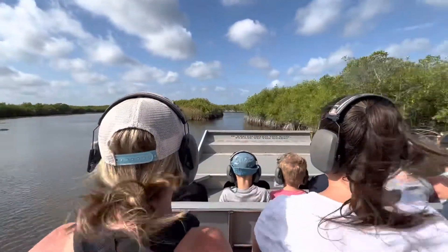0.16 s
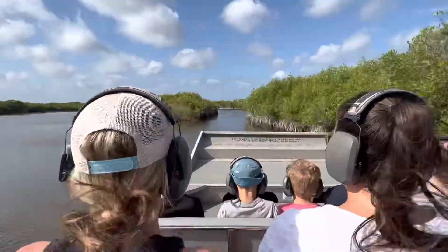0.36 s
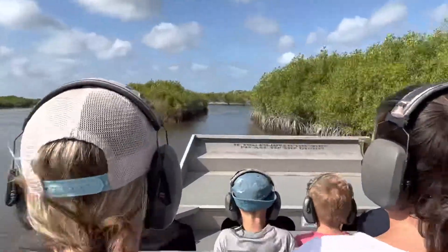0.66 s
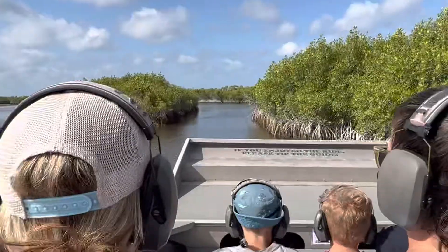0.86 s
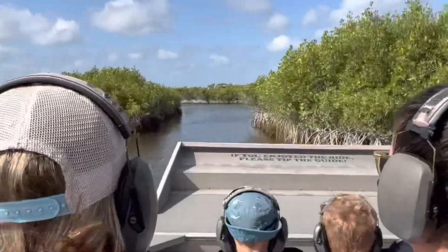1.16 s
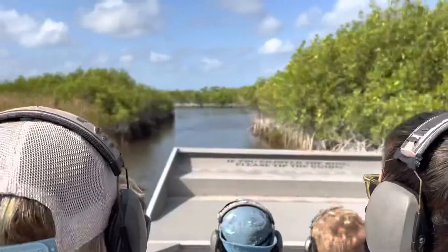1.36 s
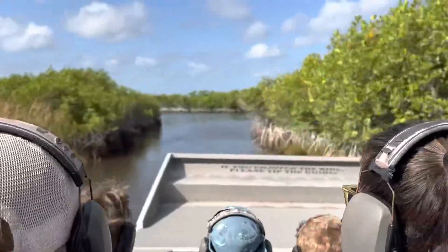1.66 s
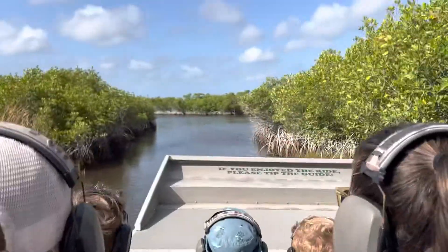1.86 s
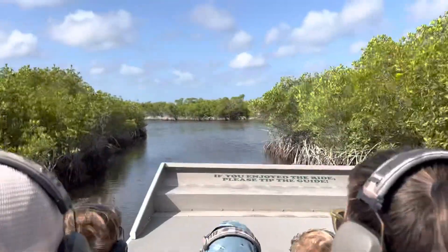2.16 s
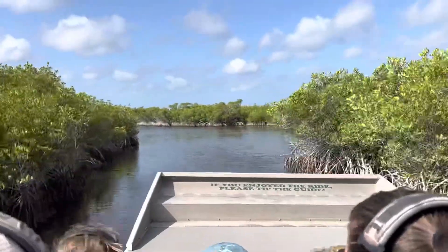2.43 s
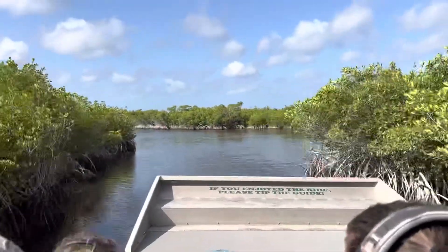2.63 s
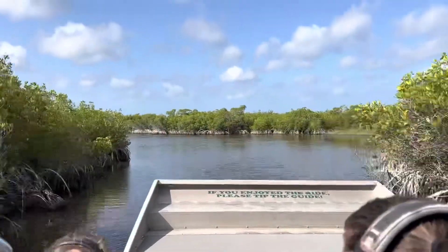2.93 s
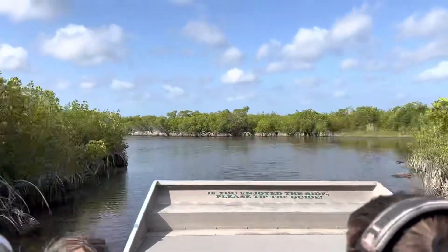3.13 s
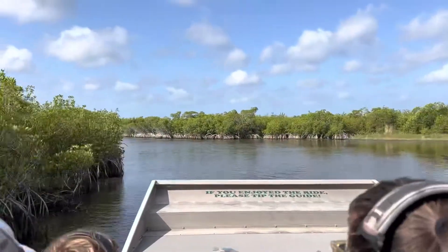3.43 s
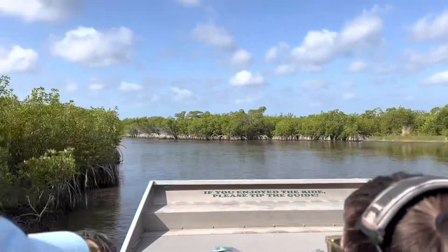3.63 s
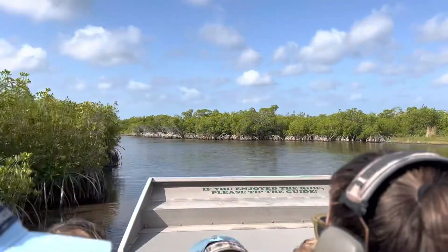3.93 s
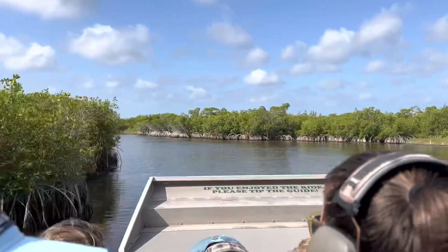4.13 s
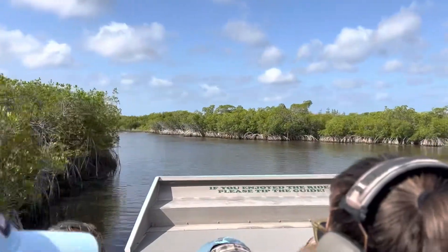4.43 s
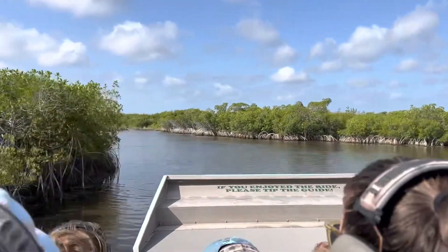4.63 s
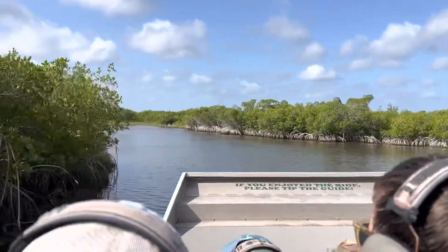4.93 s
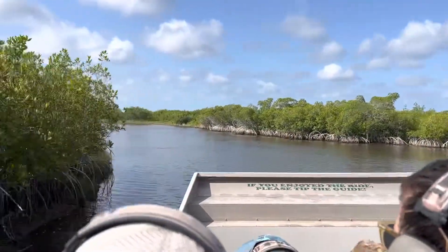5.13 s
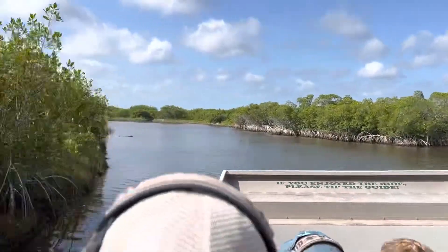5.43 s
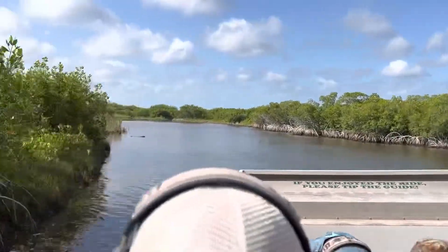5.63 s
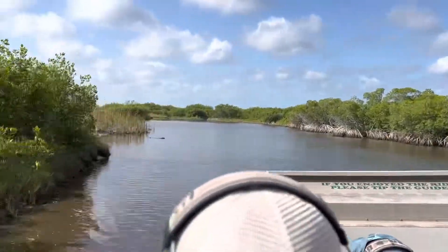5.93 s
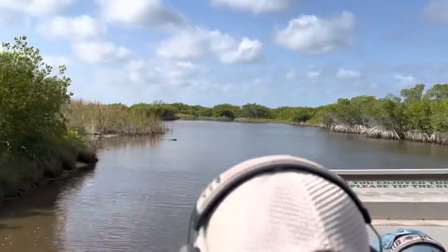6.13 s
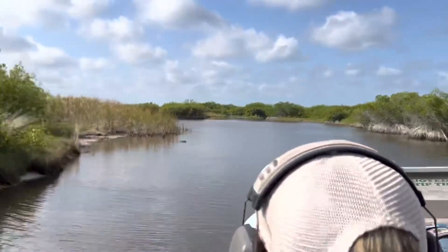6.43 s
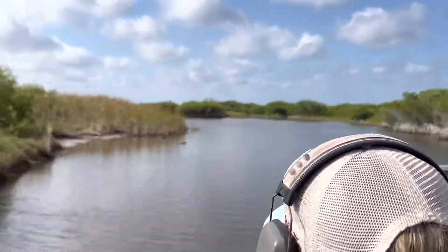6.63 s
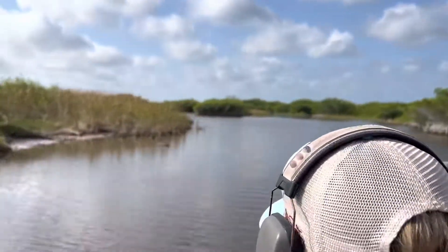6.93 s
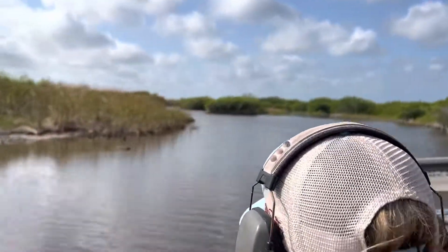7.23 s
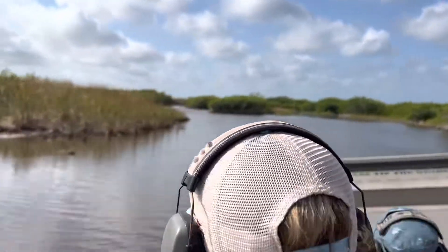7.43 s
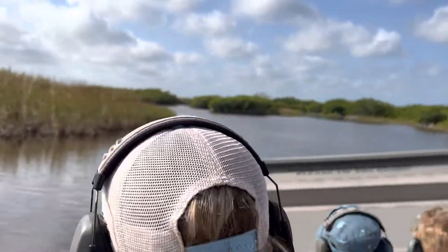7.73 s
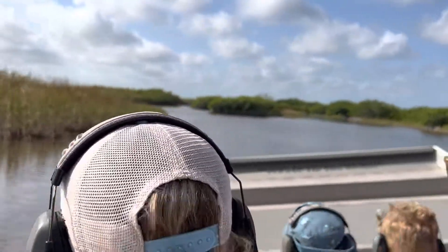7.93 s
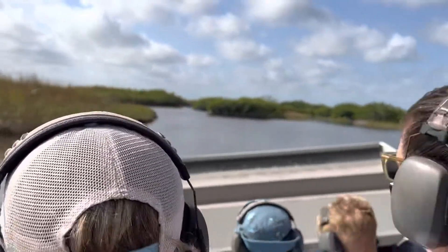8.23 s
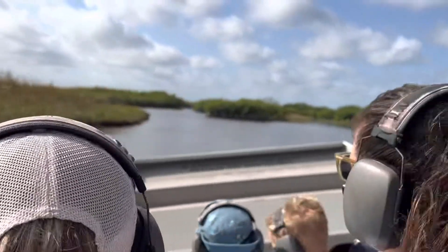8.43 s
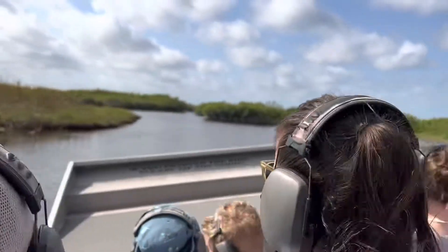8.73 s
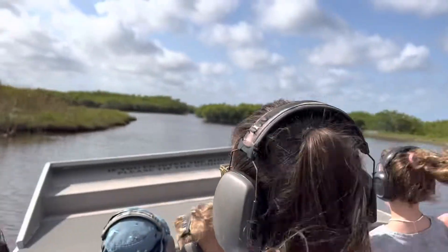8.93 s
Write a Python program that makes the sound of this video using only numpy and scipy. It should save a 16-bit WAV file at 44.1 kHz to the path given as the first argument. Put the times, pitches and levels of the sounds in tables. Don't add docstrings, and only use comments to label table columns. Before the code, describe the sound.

A loud airboat drones steadily along a channel, propeller buzzing and hissing, with early spray fizz and later heavy wind gusts thumping the microphone.

```python
import sys
import numpy as np
from scipy import signal
from scipy.fft import rfft, irfft, next_fast_len
from scipy.io import wavfile
from scipy.ndimage import uniform_filter1d, map_coordinates

SR = 44100
rng = np.random.default_rng(int(sys.argv[2]) if len(sys.argv) > 2 else 0)


def transcribe(signal):
    frames = np.atleast_2d(signal).T
    limited = np.clip(frames, -1, 1)
    pcm = np.round(limited * 32767).astype(np.int16)
    wavfile.write(sys.argv[1], SR, pcm)


def amplitude_ratio(level_db):
    exponent = np.asarray(level_db, float) / 20
    return 10 ** exponent


N = 399987

# (time [s], blade thrum [dB], engine [dB], overtones [dB])
STERN_LEVELS = [(0, -.5, 1, 2.5), (1, 0, 0, -.5), (2, 0, -.5, 0), (3, -.4, 0, 1), (4, 1.1, 0, 0),
                (5, 0, .5, 0), (6, 0, 0, 0), (7, 0, 0, 0), (8, -1.2, -.5, 0), (9.07, .5, 0, -2)]
# (time [s], facing left bank [0-1], in the turn [0-1], on open water [0-1])
MIC_HEADING = [
    (0, 0, 0, 1),
    (.75, 0, 0, 1),
    (1.1, 0, 0, 0),
    (2.6, 0, 0, 0),
    (3.8, 1, 0, 0),
    (6.5, 1, 0, 0),
    (7.1, 0, 1, 0),
    (9.07, 0, 1, 0),
]
# (time [s], level [dB])
TIP_PATH = [(0, -1), (.8, 2), (1.2, -3), (1.6, -0.5), (2.7, 1), (3.3, 2.5), (5.9, 0.5), (7, -1.5),
            (7.4, -3), (8.4, -1.5), (9.07, 0.5)]
# (frequency [Hz], left-right likeness [-1 to 1])
BLADE_LIKENESS = [(300, 0.23), (500, 0.99), (650, 0.3), (900, 0.26), (1200, 0.57), (1650, 0.26),
                  (2000, 0.16), (2500, 0.5), (3200, 0.17), (4400, 0.47), (5200, 0.3), (6000, 0.27),
                  (7300, 0.77), (8600, 0.36)]
# (frequency [Hz], left-right level [dB])
BLADE_LEAN = [(60, 1.0), (110, -1), (200, -5), (380, 1.5), (700, -3.5), (1290, -5.5), (2380, -1), (4400, 1),
              (8120, 5), (15000, -48)]
# (frequency [Hz], left leads by [rad])
BLADE_LEAD = [(300, 1.24), (500, 1.5), (650, 1.3), (900, 0.65), (1200, -0.7), (1650, -0.5), (2000, 0.5),
              (2500, -0.0), (3200, 0.5), (4400, 0.77), (5200, -2.5), (6000, 1), (7300, -2), (8600, 0)]
# (time [s], deep thud [dB], flutter [dB])
GUST_EVENTS = [(.66, -35, -18), (.93, -24, -39), (1.04, -22, -22), (1.24, -25, -15.5), (1.35, -22, -25),
               (1.62, -37, -22.5), (2.05, -38, -28), (2.36, -36, -23), (2.51, -22, -17), (2.8, -37, -20.5),
               (3.4, -40, -28), (3.95, -27, -28), (5.02, -24, -36), (5.17, -31, -30), (5.4, -27, -27),
               (5.53, -26, -23), (5.62, -27, -31), (6.12, -27, -21), (6.23, -17, -16.5), (6.43, -24, -17),
               (6.74, -30, -16.5), (6.84, -22, -21), (7.11, -20, -13.5), (7.22, -36, -17.5),
               (7.43, -30, -19), (7.63, -27, -15.5), (8.05, -32, -32), (8.36, -30, -19), (8.76, -21, -16.5),
               (9.04, -26, -13)]


def unit(x):
    return x / np.sqrt(np.mean(x ** 2) + 1e-20)


def along(points, hz):
    f, v = np.transpose(points)
    return np.interp(np.log(hz + 1), np.log(f + 1), v)


def curves(rows):
    s, *columns = np.transpose(rows)
    return [np.interp(np.arange(N) / SR, s, column) for column in columns]


def wobble(rate):
    knots = rng.standard_normal(int(N * rate / SR) + 4)
    return map_coordinates(knots, [np.arange(N) * rate / SR])


def filtered(x, response):
    m = next_fast_len(N + 8192)
    return irfft(rfft(x, m) * response(np.fft.rfftfreq(m, 1 / SR)), m)[..., :N]


def rush(spectrum, alike, lean, patchy_db, gate=1, lead=lambda hz: 0 * hz):
    z = signal.stft(rng.standard_normal((2, N)), nperseg=512)[2]
    field = uniform_filter1d(rng.standard_normal(z.shape[1:]), size=6, axis=0)
    field = uniform_filter1d(field, size=14, axis=1)
    patchy = signal.istft(z * amplitude_ratio(patchy_db * unit(field)), nperseg=512)[1][:, :N]
    blend = lambda hz: np.arccos(np.clip(along(alike, hz), -1, 1)) / 2
    mid, side = filtered(gate * patchy, lambda hz: [np.cos(blend(hz)), np.sin(blend(hz))])
    gain = lambda hz: amplitude_ratio(along(spectrum, hz) + np.outer([.5, -.5], along(lean, hz)))
    colour = lambda hz: gain(hz) * np.exp(1j * np.outer([.5, -.5], lead(hz)))
    return unit(filtered(np.array([mid + side, mid - side]), colour))


def tones(rows, turns, smear, drift_db, flutter):
    out = np.zeros((2, N))
    bank, turning, water = curves(MIC_HEADING)
    for k, left_db, right_db, lead, bank_db, turn_db, water_db in rows:
        angle = 2 * np.pi * k * turns + smear * k ** 2 + flutter * k * wobble(9)
        heading_db = bank * bank_db + turning * turn_db + water * water_db
        sway = amplitude_ratio(heading_db + drift_db * np.log(k) * wobble(7))
        stereo_angle = angle + np.array([[lead], [-lead]]) / 2
        out -= np.sqrt(2) * sway * amplitude_ratio([[left_db], [right_db]]) * np.cos(stereo_angle)
    return out


def propeller(passes):
    sweep = np.cos(2 * np.pi * passes)
    return blade_tones(passes) + blade_roar(sweep) + blade_hiss(sweep, passes) + tip_air(sweep)


def blade_tones(passes):
    # (multiple of the blade pass, left [dB], right [dB], left leads by [rad],
    #  change facing the left bank [dB], change in the turn [dB], change on open water [dB])
    overtones = [(1, -17, -18, -0.1, 1, 2, 0), (2, -32.5, -35, -0.2, 1.5, 0, 0),
                 (3, -28.5, -27, 0.2, -.5, -.5, 0), (4, -44, -38, 0.9, 2, 1, 1),
                 (5, -42, -34, -0.3, -3, -4, -2), (6, -47, -38.5, -0.8, -6, -1, -1),
                 (7, -45, -39, 1.8, 2, -6, 0), (8, -47, -35, 1.5, -3, -12, 0),
                 (9, -45, -32.5, 0.1, -3, -8, 0), (10, -49, -43, -0.1, 1, 7, 4),
                 (11, -55, -45, 0.8, 0, -2, -4), (12, -52, -47, -0.0, -1, -5, 2),
                 (13, -55, -49, -0.1, 3, 4, -4), (14, -51, -43, -1.1, 2, -3, 3),
                 (15, -49, -45, -2.4, -3, -7, 6), (16, -55, -48, -1.1, 0, -4, -3),
                 (17, -48, -43, -1.5, -4, -9, 0), (18, -52, -49, -2.3, 0, -5, 2),
                 (19, -57, -50, -2.4, 1, -5, 0), (20, -61, -52, -1.5, -5, -6, 0),
                 (21, -57, -51, -1.5, -6, -8, 0), (22, -62, -54, -1.5, -3, -6, 0)]
    thrum_db, _, over_db = curves(STERN_LEVELS)
    thrum = amplitude_ratio(thrum_db + choking()) * tones(overtones[:3], passes, smear=-.1, drift_db=1.1, flutter=.014)
    over = amplitude_ratio(over_db) * tones(overtones[3:], passes, smear=.13, drift_db=.85, flutter=.004)
    return thrum + over


def blade_lead(hz):
    return along(BLADE_LEAD, hz)


def blade_roar(sweep):
    # (frequency [Hz], density [dB per Hz])
    roar_colour = [(120, -36), (210, -9.5), (320, -3), (428, 2), (545, -7.5), (771, -4.5), (908, -8.5),
                   (1480, -11.5), (1720, -19), (3400, -24), (6600, -120)]
    path_db, = curves(TIP_PATH)
    burst = np.sqrt(1 + 0.22 * np.exp(2.05 * sweep + .5 * wobble(60)))
    roar_db = -29.64 + 0.45 * path_db + .6 * wobble(4.0) + 0.5 * wobble(14)
    noise = rush(roar_colour, BLADE_LIKENESS, BLADE_LEAN, patchy_db=1.5, gate=burst, lead=blade_lead)
    roar = amplitude_ratio(roar_db) * noise
    shaded_hz, shaded_share = 520, 0.24
    lowest = filtered(roar, lambda hz: 1 / (1 + (hz / shaded_hz) ** 6))
    return roar - shaded_share * curves(MIC_HEADING)[0] * lowest


def blade_hiss(sweep, passes):
    # (frequency [Hz], density [dB per Hz])
    hiss_colour = [(700, -120), (1200, -1.5), (2000, 3), (2470, -10), (3880, -6), (5700, -2.5),
                   (7500, -6.5), (8600, -10.5), (9500, -26), (11000, -120)]
    uneven = np.cos(2 * np.pi * passes / 3)
    swish = amplitude_ratio(1.3 * sweep + 0.6 * uneven + 0.5 * wobble(70))
    hiss_db = -37.5 + curves(TIP_PATH)[0] + 0.089 * wobble(9.1)
    noise = rush(hiss_colour, BLADE_LIKENESS, BLADE_LEAN, patchy_db=0.87, gate=swish, lead=blade_lead)
    return amplitude_ratio(hiss_db) * noise


def tip_air(sweep):
    # (frequency [Hz], density [dB per Hz])
    air_colour = [(6000, -120), (7200, -30), (8300, -4), (9500, -4), (11000, -2), (12000, 0), (13000, -3),
                  (14000, -4), (15700, -5)]
    port_lag_s, in_step_hz = 1 / 3430, 12000
    sideways = lambda hz: -2 * np.pi * port_lag_s * (hz - in_step_hz)
    air_db = -47 + .5 * wobble(18)
    swish = amplitude_ratio(1.2 * sweep + .7 * wobble(70))
    return amplitude_ratio(air_db) * rush(air_colour, [(9000, .96)], [(9000, .1)], patchy_db=1.1, gate=swish, lead=sideways)


def engine(passes):
    # (multiple of the four-stroke cycle, left [dB], right [dB], left leads by [rad],
    #  change facing the left bank [dB], change in the turn [dB], change on open water [dB])
    exhaust_tones = [(2, -37, -38, -0.1, 1, 2, 0), (3, -25, -26, -0.1, 0, -4, 0),
                     (5, -34, -36, -0.3, 2, -3, 1), (6, -43, -44, -0.2, 0, 0, -3),
                     (7, -41, -42, -0.2, 3, 1, 2), (8, -38, -44, -0.2, 5, 5, 0),
                     (9, -45, -42, -1.5, 4, 3, 7), (10, -42, -36, -0.2, -3, -7, 1),
                     (11, -47, -48, -1.7, 0, 8, 0), (12, -58, -61, -0.9, 12, 9, 0),
                     (13, -47, -39, 0.0, 0, -6, 0), (15, -62, -49, 0.1, 2, 3, 0),
                     (16, -63, -49, -0.5, -5, -1, 0), (18, -56, -48, -0.7, -4, -11, 0),
                     (24, -59, -48, 0.0, 2, -2, 0), (26, -47, -51, 0.9, 2, -2, 3)]
    cycles_per_blade, cycle_at_start = .38194, .18
    cycles = cycles_per_blade * passes + cycle_at_start
    firing = tones(exhaust_tones, cycles, smear=.9, drift_db=.6, flutter=.02)
    return amplitude_ratio(curves(STERN_LEVELS)[1] + choking()) * firing


def choking():
    # (time [s], gain change [dB])
    choke_events = [(2.47, 0.5), (5.392, 1.5), (5.424, -4), (6.2, -1), (6.405, -1), (6.465, -12),
                    (6.79, -5), (7.13, -11), (7.195, 0), (7.235, 4.5), (7.262, -8), (7.635, -3.5),
                    (7.66, 5.5), (7.687, -9), (8.67, 1.5), (8.702, -2), (8.755, -6), (8.785, 5), (8.9, 1),
                    (6.12, -2.5), (7.01, 0), (8.3, -0.5)]
    choke_s = .02
    s, db = np.transpose(choke_events)
    coarse = np.arange(0, N, 64)
    bumps = np.exp(-((coarse / SR - s[:, None]) / choke_s) ** 2)
    return np.interp(np.arange(N), coarse, db @ bumps)


def wind():
    # (time [s], flutter [dB])
    steady_wind = [(0, -33), (.5, -28), (.9, -28.5), (1.3, -24.5), (2, -28), (3.2, -34.5), (4.5, -33.5),
                   (5.3, -32), (5.85, -25.5), (6.15, -26), (6.7, -21.5), (7.5, -24), (8.2, -26.5),
                   (8.7, -23.5), (9.07, -21.5)]
    # (frequency [Hz], density [dB per Hz])
    thud_colour = [(20, -33), (35, -15.5), (50, -4), (70, 0), (95, -5), (120, -13), (150, -22), (250, -45),
                   (600, -120)]
    buffet_colour = [(40, -60), (90, -3.5), (130, 3), (250, 0), (450, -7.5), (1300, -25.5), (2500, -37),
                     (6000, -120)]
    steady_db, = curves(steady_wind)
    _, deep_db, flutter_db = np.transpose(GUST_EVENTS)
    thud_power = amplitude_ratio(1.78 * (steady_db - 9 + 4.0 * wobble(14))) + gusts(deep_db)
    buffet_power = amplitude_ratio(1.743 * (steady_db + 0.48 * wobble(9.3))) + gusts(flutter_db - 1.3)
    thud = rush(thud_colour, [(40, .88)], [(60, .6)], patchy_db=.5, gate=amplitude_ratio(1.6 * wobble(25)))
    lumps = amplitude_ratio(1.2 * wobble(25) + 1.4 * wobble(70))
    buffet_alike = [(100, 0.63), (250, 0.91), (800, 0.69)]
    buffet = rush(buffet_colour, buffet_alike, [(100, 0.44)], patchy_db=0.44, gate=lumps)
    deep = amplitude_ratio(2.0 + .5 * choking()) * np.sqrt(thud_power) * thud
    return deep + amplitude_ratio(-3.5) * np.sqrt(buffet_power) * buffet


def gusts(peaks_db):
    rise_s, fall_s = .036, .036
    coarse = np.arange(N)[::64]
    lag = coarse / SR - np.transpose(GUST_EVENTS)[0][:, None]
    shape = np.exp(-(lag / np.where(lag < 0, rise_s, fall_s)) ** 2)
    return np.interp(np.arange(N), coarse, amplitude_ratio(2 * peaks_db) @ shape)


def thumps():
    # (time [s], peak [dB], swing [Hz])
    thump_events = [(1.1624, -11, 98), (1.2293, -8, 101), (1.2998, -12, 88), (1.3804, -11, 84),
                    (2.4975, -13, 94), (6.0966, -9, 94), (6.2294, -9, 114), (6.3827, -13, 86),
                    (6.4392, -9, 85), (6.623, -7, 105), (6.6778, -10, 80), (6.7298, -6, 97),
                    (6.7808, -9, 98), (6.8272, -10, 89), (6.8672, -12, 71), (6.9869, -11, 86),
                    (7.0381, -12, 86), (7.1336, -10, 95), (7.223, -8, 111), (7.4384, -12, 84),
                    (7.6152, -14, 110), (7.6501, -9, 113), (8.0179, -12, 110), (8.3567, -12, 120),
                    (8.6802, -11, 82), (8.7805, -12, 111), (8.898, -11, 107), (9.0138, -11, 73)]
    out, t = np.zeros(N + 4000), np.arange(-1500, 1500) / SR
    for s, db, hz in thump_events:
        swing = np.cos(2 * np.pi * hz * t) * np.exp(-(hz * t / 0.89) ** 2)
        out[round(s * SR) - 1500:][:len(t)] += amplitude_ratio(db - 1.5) * swing
    return out[:N] * amplitude_ratio([[.4], [-.4]]) 


def flaps():
    # (time [s], peak [dB], frequency [Hz])
    flap_events = [(0.211, -17, 352), (1.224, -10, 205), (1.374, -24, 340), (1.379, -18, 191),
                   (1.689, -20, 441), (1.78, -16, 263), (2.001, -20, 424), (2.342, -20, 434),
                   (2.488, -25, 342), (2.506, -19, 204), (3.383, -21, 420), (5.05, -22, 430),
                   (5.136, -21, 294), (5.508, -13.5, 194), (5.54, -15, 193), (5.698, -20, 430),
                   (5.922, -24, 347), (5.926, -13.5, 200), (5.978, -17, 350), (6.009, -12.5, 195),
                   (6.087, -19, 376), (6.128, -23, 395), (6.222, -11, 190), (6.429, -9, 223),
                   (6.541, -20, 348), (6.649, -13, 195), (6.686, -12.5, 280), (6.762, -13.5, 350),
                   (6.85, -9, 240), (6.965, -24, 344), (7.046, -10, 253), (7.08, -15, 215),
                   (7.113, -19, 387), (7.217, -13, 182), (7.393, -16, 340), (7.444, -16, 215),
                   (7.492, -21, 387), (7.55, -14, 204), (7.574, -23, 523), (7.592, -22, 387),
                   (7.61, -19, 192), (8.011, -23, 404), (8.305, -17.5, 410), (8.336, -19, 410),
                   (8.357, -18, 193), (8.522, -17, 260), (8.702, -21, 412), (8.771, -19.5, 448),
                   (8.844, -16, 204), (8.959, -14, 260), (9.005, -12.5, 246)]
    half_length_s, flap_db, lead_scatter_rad = 0.013, -3.5, 0.18
    out, t = np.zeros((2, N + 4000)), np.arange(-1500, 1500) / SR
    chances = rng.standard_normal((len(flap_events), 2))
    for (s, db, hz), (start, lead) in zip(flap_events, chances):
        stereo_lead = lead_scatter_rad * lead * np.array([[1], [-1]])
        angle = 2 * np.pi * hz * t + np.pi * start + stereo_lead
        flap = np.cos(angle) * np.exp(-(t / half_length_s) ** 2)
        out[:, round(s * SR) - 1500:][:, :len(t)] += amplitude_ratio(db + flap_db) * flap
    return out[:, :N]


def slaps():
    # (time [s], peak [dB], left-right level [dB], centre [Hz])
    slap_events = [(.5267, -25, 0, 3200), (.7357, -28, -.5, 2800), (1.0326, -25, -.5, 3000),
                   (4.7217, -29, -3.5, 2000), (6.5934, -32, -2, 2200), (6.6623, -31, -3, 2000),
                   (6.7151, -21, 0, 3400), (6.766, -27, -2.5, 1500), (7.0489, -30, -.5, 2200),
                   (7.0718, -26, -1, 2900), (7.1062, -32, -2, 2400), (7.144, -22, -1.5, 2900),
                   (7.209, -28, -2, 2300), (7.3851, -27, -1.5, 3600), (7.533, -30, 0, 2400),
                   (7.5722, -27, -1, 2000), (7.6024, -22, .5, 2700), (7.7418, -30, -1.5, 2000),
                   (8.7755, -24, -1.5, 2600)]
    rise_s, t60_s = .0007, .019
    t, out = np.arange(900) / SR, np.zeros((2, N + 900))
    envelope = amplitude_ratio(-60 * t / t60_s) * (1 - np.exp(-t / rise_s))
    for s, db, pan_db, hz in slap_events:
        band = signal.butter(3, [.3 * hz, 1.35 * hz], "band", fs=SR)
        puff = signal.lfilter(*band, envelope * rng.standard_normal(len(t)))
        gain = amplitude_ratio(db - .8 + np.array([[pan_db], [-pan_db]]) / 2)
        out[:, round(s * SR):][:, :len(t)] += gain * puff / np.abs(puff).max()
    return out[:, :N]


def crackle():
    # (frequency [Hz], density [dB per Hz])
    crackle_colour = [(500, -120), (800, -8), (1300, 0), (2200, -5), (3200, -14), (5000, -120)]
    rattle = rush(crackle_colour, [(1500, 0.28)], [(1500, -2)], patchy_db=1.0, gate=amplitude_ratio(4.5 * wobble(180)))
    return np.sqrt(gusts(np.transpose(GUST_EVENTS)[2] - 21)) * rattle


def spray(passes):
    # (time [s], level [dB])
    spray_level = [
        (0, -33.5),
        (.45, -34),
        (.75, -38.5),
        (1.05, -45.5),
        (2.5, -69),
        (8.2, -57),
        (8.6, -46),
        (8.85, -43),
        (9.07, -38),
    ]
    # (frequency [Hz], density [dB per Hz])
    fizz_colour = [(1300, -120), (2200, 3.5), (2900, 3), (4500, 2.5), (6000, 1), (7500, 1.5), (8900, -2.5),
                   (10200, -17), (11200, -13), (14000, -60)]
    rasp_colour = [(500, -120), (800, -11), (1050, 0), (1250, 2), (1550, -18), (1900, -34), (3000, -120)]
    fizz = rush(fizz_colour, [(3000, 0.038)], [(3000, 5.8)], patchy_db=1.2, gate=amplitude_ratio(2.0 * wobble(200)))
    beats = amplitude_ratio(5 * np.cos(2 * np.pi * passes) + 1.2 * wobble(50))
    rasp = rush(rasp_colour, [(1200, .1)], [(1200, -0.51)], patchy_db=.6, gate=beats)
    return amplitude_ratio(curves(spray_level)[0]) * (fizz + amplitude_ratio(1.0) * rasp)


def scene():
    # (time [s], blade passes [Hz])
    shaft_speed = [(0, 85.12), (0.5, 85.41), (1.5, 85.2), (2.5, 84.82), (3.3, 85.05), (4, 86.03),
                   (4.5, 86.24), (5.5, 86.4), (6, 86.8), (6.6, 86.64), (6.8, 85.79), (7, 83.98),
                   (7.2, 82.92), (7.65, 82.05), (7.9, 82.45), (8.5, 82.38), (8.75, 82.85), (9.07, 84.5)]
    passes = np.cumsum(curves(shaft_speed)[0]) / SR
    boat = propeller(passes) + engine(passes)
    air = wind() + thumps() + flaps() + slaps() + crackle()
    return boat + air + spray(passes)


def low_pass(x):
    return signal.sosfilt(signal.butter(12, 17100, fs=SR, output="sos"), x)


def record(dry):
    ceiling, top_hz = 0.83, 15750
    rounded = dry / (1 + np.abs(dry / ceiling) ** 4) ** (1 / 4)
    mix = filtered(rounded, lambda hz: hz < top_hz)
    return low_pass(mix)


dry = scene()
out = record(dry)
transcribe(out)
```